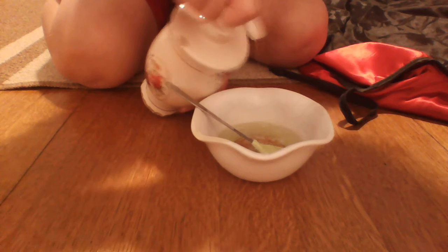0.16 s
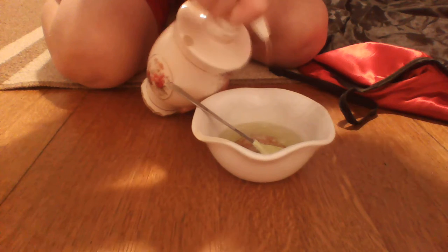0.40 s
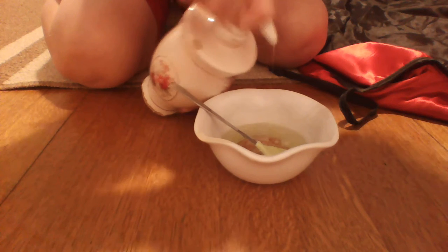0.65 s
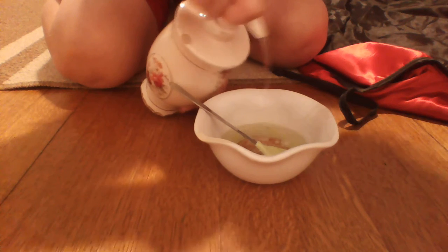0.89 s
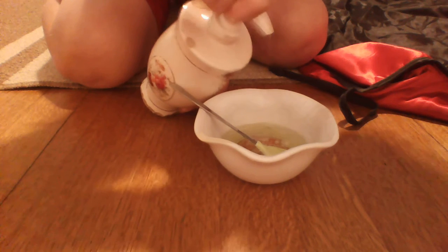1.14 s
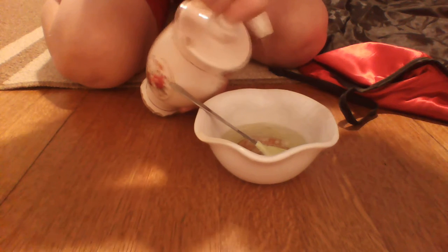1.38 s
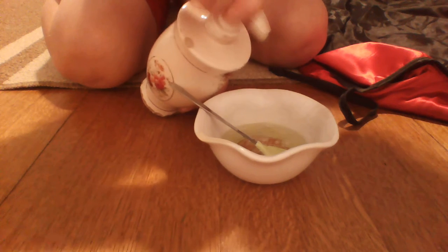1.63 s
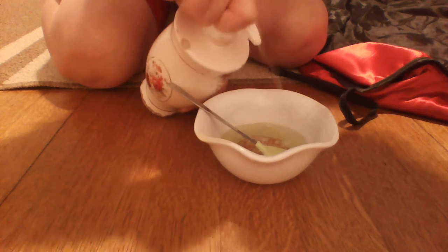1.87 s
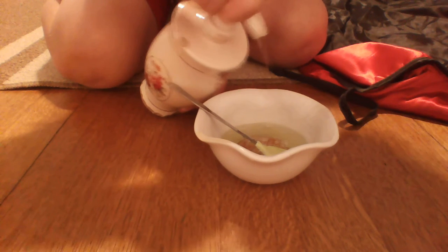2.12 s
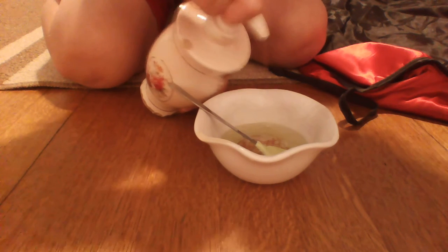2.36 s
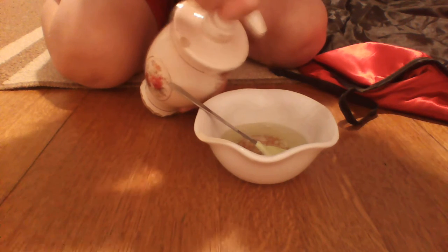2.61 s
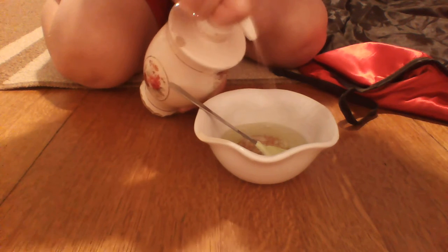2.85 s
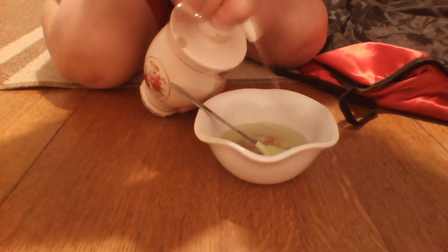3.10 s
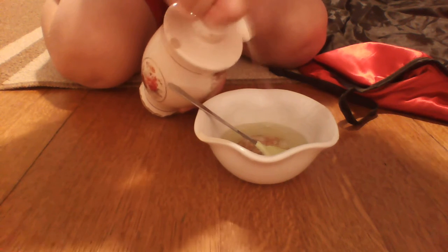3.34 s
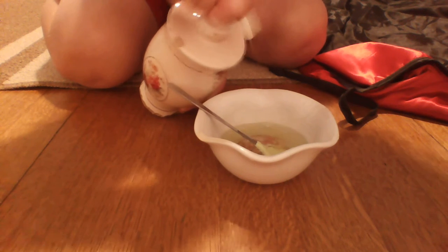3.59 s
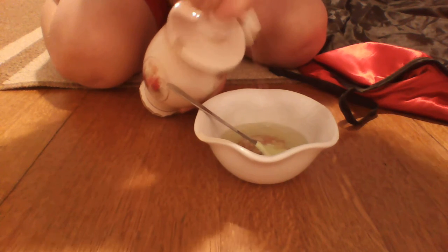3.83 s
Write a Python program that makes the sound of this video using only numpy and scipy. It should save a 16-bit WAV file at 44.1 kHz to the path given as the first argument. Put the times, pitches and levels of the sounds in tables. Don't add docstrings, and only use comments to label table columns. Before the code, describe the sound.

Three knocks of a ceramic jar on floorboards, then fast pump strokes thudding and clicking, with tiny ticks and clinks over camera hiss.

```python
import sys
import numpy as np
from scipy import signal
from scipy.fft import rfft, irfft, next_fast_len
from scipy.io import wavfile
from scipy.ndimage import uniform_filter1d

SR = 44100
rng = np.random.default_rng(int(sys.argv[2]) if len(sys.argv) > 2 else 0)


def wav_out(sig):
    wavfile.write(sys.argv[1], SR, np.round(np.clip(np.atleast_2d(sig).T, -1, 1) * 32767).astype(np.int16))


def volts(x):
    e = np.asarray(x, float) / 20
    return 10 ** e


N = 177855


def unit_rms(x):
    return x / np.sqrt(np.mean(x ** 2) + 1e-20)


def along(points, hz):
    point_hz, value = np.transpose(points)
    return np.interp(np.log(hz + 1), np.log(point_hz + 1), value)


def filtered(x, response):
    size = next_fast_len(x.shape[-1] + 8192)
    spectrum = rfft(x, size) * response(np.fft.rfftfreq(size, 1 / SR))
    return irfft(spectrum, size)[..., :x.shape[-1]]


def add(track, start_s, sound):
    part = track[..., round(start_s * SR):][..., :sound.shape[-1]]
    part += sound[..., :part.shape[-1]]


def ring(modes, scatter_db):
    t = np.arange(SR // 4) / SR
    hz, level_db, t60_s, sign = np.transpose(modes)[..., None]
    strength = np.sign(sign) * volts(level_db + scatter_db * rng.standard_normal(level_db.shape))
    modes_ringing = strength * volts(-60 * t / t60_s) * np.sin(2 * np.pi * hz * t)
    return np.sum(modes_ringing, axis=0)


def burst(hz, width_hz, t60_s, alike=0.87, rise_s=0.00039):
    t = np.arange(SR // 8 if t60_s > .045 else SR // 20) / SR
    envelope = volts(-60 * t / t60_s) * (1 - np.exp(-t / rise_s))
    common, apart = rng.standard_normal((2, len(t))) * envelope
    pair = [common + (1 - alike) * apart, common - (1 - alike) * apart]
    peak = signal.iirpeak(min(hz, SR / 2.2), hz / width_hz, SR)
    pair = signal.lfilter(*peak, signal.lfilter(*peak, pair))
    return pair / np.abs(pair).max()


def noise(spectrum, alike):
    def mid_side(hz):
        angle = np.arccos(np.clip(along(alike, hz), -1, 1)) / 2
        return volts(along(spectrum, hz)) * [np.cos(angle), np.sin(angle)]

    mid, side = filtered(rng.standard_normal((2, N)), mid_side)
    return unit_rms(np.array([mid + side, mid - side]))


# hz, density_db
HISS_COLOUR = [(30, -11.5), (90, -13), (240, -13), (800, -28), (4200, -32), (7300, -32), (12600, -24.5),
               (16500, -30.5)]
# hz, correlation
HISS_ALIKE = [(60, 0.15), (300, 0.59), (700, 0.35), (3000, -0.014), (7000, -0.3), (15000, -0.4)]
# hz, level_db, left_right_db, cycle_share, right_lag_rad
WHINES = [(8110, -71, -16, 0.58, 2.63), (12600, -59, 6, 0.26, 1.2), (12850, -66.5, 2, .27, 1.1),
          (11800, -62.5, -4.5, 0.47, 4)]
CYCLE_HZ = 7.4925


def camera():
    t = np.arange(N) / SR
    phase = (t * CYCLE_HZ + .1) % 1

    def gate(start, share):
        return uniform_filter1d(1. * ((phase - start) % 1 < share), size=200)

    hiss = volts(-51.5) * noise(HISS_COLOUR, HISS_ALIKE)
    treble = filtered(hiss, lambda hz: hz ** 4 / (hz ** 4 + 8000 ** 4))
    out = hiss - 0.32 * gate(0.44, 0.12) * treble
    for hz, level_db, pan_db, share, lag_rad in WHINES:
        drift = np.cumsum(rng.standard_normal(N)) * 0.055
        tone = np.sin(2 * np.pi * hz * t + drift - lag_rad * np.array([[0], [1]]))
        level = volts(level_db + pan_db * np.array([[.5], [-.5]]))
        out += level * gate(.26 - share, share) * tone
    return out


# peak_s, level_db, rise_s, fall_s
SHIFTS = [
    (.11, -36.5, 0.055, .2),
    (.41, -49.5, 0.036, 0.81),
    (0.981, -36.5, .09, 0.42),
    (1.77, -52, 0.31, .7),
    (2.6, -55, 0.76, .1),
    (2.9, -51, .1, 0.986),
    (3.43, -48, 0.16, 0.1),
    (3.88, -54, 0.118, .2),
]
# hz, density_db
RUMBLE_COLOUR = [(12, -27.5), (22, -1.5), (40, -3), (65, -0.5), (90, -5.5), (118, -27), (170, -39.5),
                 (290, -120)]
MURMUR_DB = -60.5


def rumble():
    peak_s, level_db, rise_s, fall_s = np.transpose(SHIFTS)[..., None]
    late_s = np.arange(N) / SR - peak_s
    swells = volts(level_db - 20 * np.where(late_s < 0, -late_s / rise_s, late_s / fall_s))
    level = np.sqrt(np.sum(swells ** 2, axis=0) + volts(MURMUR_DB) ** 2)
    return level * noise(RUMBLE_COLOUR, [(60, .88)]) * volts([[.4], [-.4]])


# start_s, peak_db, brightest_hz
TICKS = [(.2775, -40, 5770), (.5054, -43, 12450), (.7752, -41, 5945), (1.2516, -38.5, 6200),
         (1.6756, -34.5, 12500), (1.7928, -36.5, 9400), (1.8672, -40.5, 12450), (2.0511, -32.5, 9100),
         (2.2324, -40, 12500), (2.367, -30.5, 12700), (2.6464, -32.5, 12200), (2.9321, -31.5, 12600),
         (3.1861, -34, 12800), (3.3899, -29, 13200), (3.6341, -35.5, 12380), (3.8593, -28.5, 13160)]
# start_s, peak_db, brightest_hz
THIN_TICKS = [
    (.044, -37, 11800),
    (.535, -41, 5800),
    (3.688, -38, 14500),
    (3.691, -26, 14130),
]
# start_s, peak_db, brightest_hz
DULL_TICKS = [
    (.4159, -46, 6324),
    (.6353, -51.5, 13000),
]
TICK_LAW, THIN_LAW, DULL_LAW = (-11.5, 0.69), (-27, .1), (8.2, 0.59)


def valve():
    out = np.zeros((2, N))
    kinds = [(TICKS, TICK_LAW), (THIN_TICKS, THIN_LAW), (DULL_TICKS, DULL_LAW)]
    ticks = sorted((*row, *law) for rows, law in kinds for row in rows)
    for start_s, peak_db, hz, dull_db, breadth in ticks:
        snap = burst(hz, 3130, 0.0079, alike=0.26)
        snap = snap + breadth * burst(9000, 7800, 0.013, alike=0.93)
        add(out, start_s, volts(peak_db - 1.0) * snap)
        add(out, start_s, volts(peak_db + dull_db + 3) * burst(2400, 1400, .016))
    return out


# start_s, force_db, click_hardness_db (over force)
PRESSES = [(.0591, -33.5, 0.5), (.541, -31.5, -8), (.7979, -42.5, -0.5), (1.0394, -30.5, -11),
           (1.2819, -41, -46), (1.476, -30, -17), (1.8767, -30.5, -15.5), (2.2398, -30, -10),
           (2.5187, -28, -9.5), (2.8071, -29.5, -12.5), (3.0812, -26.5, -4), (3.3174, -30.5, -10),
           (3.527, -28.5, -8.5), (3.7705, -30.5, -9), (3.9186, -43, -1), (4.0063, -30, -8)]
# start_s, force_db, click_hardness_db
RETURNS = [(.9, -38, 3), (1.3601, -37.5, 4.5), (1.6985, -34.5, -.5), (1.7562, -36, 6.5),
           (2.0747, -34.5, -7.5), (2.386, -32.5, -3), (2.44, -37.5, 7.5), (2.669, -36, -13),
           (2.9504, -33, -2), (3.0004, -34, 3.5), (3.208, -33.5, -3.5), (3.3993, -32, -5.5),
           (3.4277, -33.5, 5.5), (3.6628, -33, -4), (3.878, -35.5, -5)]
# start_s, force_db, click_hardness_db
SETTLES = [(1.1161, -43.5, -16), (1.5517, -40.5, -19), (1.9465, -45.5, -23), (2.154, -43.5, -0.5),
           (2.305, -44.5, -14.5), (2.5749, -40.5, 11), (2.842, -44, -3), (2.863, -45, -2),
           (3.108, -44, -34), (3.224, -56, -9), (3.5783, -44, -15), (3.6973, -55, 27.5),
           (3.9509, -40.5, -3)]
# direction, hollow_db (over force), hollow_db_per_hardness_db,
# tap_db (over force), tap_db_per_hardness_db
PRESS_LAW = (1, -3.5, -.2, -7.5, 0)
RETURN_LAW = (-0.5, 3.6, 0.91, -7, 0.16)
SETTLE_LAW = (-1, 9, .15, -14, .3)
GRIP_S, GRIP_DB_PER_S = 2.66, -3.5


def stops():
    rows = []
    for table, law in [(PRESSES, PRESS_LAW), (RETURNS, RETURN_LAW), (SETTLES, SETTLE_LAW)]:
        way, hollow_db, hollow_grows, tap_db, tap_grows = law
        for start_s, force_db, hard_db in table:
            grip_db = GRIP_DB_PER_S * max(start_s - GRIP_S, 0)
            hollow = force_db + hollow_db + hollow_grows * hard_db + grip_db
            tap = force_db + tap_db + tap_grows * hard_db
            rows.append((start_s, way, force_db, hollow, tap, force_db + hard_db))
    return sorted(rows)


# hz, level_db, t60_s, sign
BOOM = [(95, -13, .3, -1), (164, -10, .22, 1), (195, -7, .27, -1), (211, -6, .2, 1), (239, -2, .26, -1),
        (275, -13, .23, 1), (298, -18, .13, -1)]
# hz, level_db, t60_s, sign
HOLLOW = [(376.9, -19.5, 0.043, -1), (492.9, -4.5, 0.047, 1), (663, -10.5, 0.013, -1)]
PUSH_RISE_S = .003


def pump():
    out = np.zeros((2, N))
    push = 1 - np.exp(-np.arange(SR // 4) / SR / PUSH_RISE_S)
    for start_s, way, boom_db, hollow_db, tap_db, click_db in stops():
        boom = volts(boom_db) * push * ring(BOOM, scatter_db=2.3) * volts([[.4], [-.4]])
        hollow = volts(hollow_db) * ring(HOLLOW, scatter_db=3.0)
        add(out, start_s, np.sign(way) * (boom + hollow))
        tap = 0.57 * burst(1400, 600, 0.016) + 0.4 * burst(860, 500, 0.016)
        add(out, start_s, volts(tap_db + 0.7) * tap)
        drag = burst(2400, 1900, 0.13, rise_s=0.0067, alike=0.57)
        add(out, start_s - .008, volts(click_db / 2 - 34.0) * drag)
        click = burst(2240, 1000, 0.0099) + 0.82 * burst(2880, 946, 0.0097)
        click = click + 0.14 * burst(8000, 12000, 0.0066)
        add(out, start_s, volts(click_db - 3.5) * click)
    return out


# start_s, peak_db, boom_db
KNOCKS = [
    (0.0821, -5, -24),
    (0.379, -9.5, -35.5),
    (0.552, -20, -41),
]
# hz, level_db, t60_s, sign
PLANK = [(422.8, -15.5, 0.034, 1), (565, -15.5, 0.019, 1), (608, -19.5, 0.11, -1), (655, -14.5, 0.025, 1),
         (872.4, -13, 0.022, -1), (912, -14.5, 0.041, -1), (1109, 1.5, 0.0067, 1), (1210, 1, 0.0086, -1),
         (1623, -6.5, 0.019, 1), (1364, -22.5, 0.031, -1), (1740, -20, 0.017, -1)]
# hz, level_db, t60_s, sign
JOISTS = [(183, -7, 0.095, -1), (225, 4, 0.036, 1), (238.5, -1, 0.24, -1), (264.3, -11.5, 0.27, 1),
          (285, -16.5, 0.23, -1), (387, -22.5, 0.34, 1)]
SOFTER_DB_PER_OCTAVE, SOFTEST_DB, PIVOT_HZ = 0.2159, 18.5, 900


def knocks():
    out = np.zeros((2, N))
    touches = [(.059, -37.5, -58.5), (.5597, -60, -38), (1.7155, -46, -51)]
    for start_s, peak_db, boom_db in KNOCKS + touches:
        soft = SOFTER_DB_PER_OCTAVE * min(KNOCKS[0][1] - peak_db, SOFTEST_DB)
        plank = [(hz, level_db - soft * np.log2(hz / PIVOT_HZ), t60_s, sign)
                 for hz, level_db, t60_s, sign in PLANK]
        add(out, start_s, volts(peak_db + 4.0) * ring(plank, scatter_db=.8))
        add(out, start_s, volts(boom_db + 6.5) * ring(JOISTS, scatter_db=3.3))
        dense = burst(1500, 1100, 0.017, rise_s=0.0014, alike=0.43)
        add(out, start_s, volts(peak_db - 12.5) * dense)
        low_tail = burst(620, 740, 0.16, rise_s=0.00093, alike=0.23)
        add(out, start_s, volts(peak_db - 17.0) * low_tail)
    return out


# start_s, crack_db, belly_db, shoulder_db
RATTLE = [
    (.0827, -23, -16.5, -28),
    (.091, -27, -31, -26),
    (.0972, -20.5, -48, -28.5),
    (.1054, -42, -40, -50.5),
    (.3795, -31, -33, -23),
    (.3854, -27, -23, -41.5),
    (.3934, -34.5, -55, -33),
    (.5531, -37, -43, -38),
]
# start_s, crack_db, belly_db, shoulder_db
CLINKS = [(.0795, -51, -41, -39.5), (.2658, -44, -55, -56), (.2959, -34, -48, -44),
          (.3364, -43, -54.5, -47.5), (.6561, -44, -44.5, -47), (1.7144, -37.5, -50, -44.5),
          (2.5743, -22, -39, -35), (2.63, -58, -45, -64), (2.7747, -32.5, -46, -44),
          (2.8661, -36, -44.5, -46), (3.0536, -26.5, -36.5, -35.5), (3.2204, -54, -44, -54),
          (3.6969, -22, -33.5, -34), (3.93, -30.5, -36, -42)]
# hz, level_db, t60_s, left_right_db (lying tilted)
JAR = [(1978, 1.5, 0.048, 2), (2008, -14, 0.2, 16), (1866, -7, .05, -8), (2240, -18, 0.018, -4),
       (2620, -26, 0.019, -4), (3240, 0.5, 0.04, 1), (3814.6, -1, 0.066, -3), (4659.7, 0, 0.063, -6.5),
       (4820, -19, 0.11, -2), (4870, -2.5, 0.028, -8.5), (5770, 6.5, 0.055, -8), (6260, 0, 0.065, -10.5)]


def ceramic(contacts, tilt, chime_db, crack_gain_db, free, scrape_db, chatter_db, neck_db, lip_db):
    out = np.zeros((2, N))
    t = np.arange(SR // 5) / SR
    hz, mode_db, t60_s, pan_db = np.transpose(JAR)[..., None]
    group = np.searchsorted([3000, 4300, 5400], hz)
    for start_s, crack_db, belly_db, shoulder_db in contacts:
        group_db = [belly_db, crack_db + neck_db, shoulder_db, crack_db + lip_db]
        loudest_db = max(group_db)
        wander = np.cumsum(rng.standard_normal((len(hz), len(t))), axis=1) * 0.049
        spread, detune = rng.standard_normal((2, *hz.shape))
        level_db = np.array(group_db)[group] + mode_db + 6 + 1.7 * spread
        envelope = volts(level_db - 60 * t / (free * t60_s)) * (1 - np.exp(-t / 0.0025))
        tones = envelope * np.sin(2 * np.pi * hz * (1 + 0.0013 * detune) * t + wander)
        sides = [np.sum(tones * volts(side * tilt * pan_db / 2), axis=0) for side in (1, -1)]
        add(out, start_s, np.array(sides))

        crack = burst(12000, 8000, 0.015, alike=0.11) * volts([[-.8], [.8]])
        add(out, start_s, volts(crack_db + crack_gain_db) * crack)
        add(out, start_s, volts(crack_db + chime_db) * burst(8050, 350, .035, alike=.3))
        add(out, start_s, volts(loudest_db - 5.5) * burst(1600, 6000, 0.012, alike=0.11))
        scrape = burst(470, 500, 0.13, rise_s=0.00067, alike=0.93)
        add(out, start_s, volts(loudest_db + scrape_db) * scrape)
        belly = burst(1994, 250, 0.21, rise_s=0.0013, alike=0.23)
        add(out, start_s, volts(group_db[0] + chatter_db) * belly)
        lip = burst(5560, 1500, 0.17, rise_s=0.0038, alike=0.35)
        add(out, start_s, volts(group_db[3] + chatter_db) * lip)
        neck = burst(3400, 2000, 0.092, rise_s=0.0036, alike=0.21)
        add(out, start_s, volts(group_db[1] + chatter_db) * neck)
    return out


# hz, t60_s
ROOM = [(150, 0.63), (700, 0.46), (2000, 0.33), (8000, 0.28)]


def room(x):
    out = np.zeros((2, N))
    step = SR // 3
    for start in range(0, N, step):
        hz, t, cells = signal.stft(rng.standard_normal((2, SR // 2)), SR, nperseg=256)
        decay = volts(-60 * t / along(ROOM, hz)[:, None])
        tail = signal.istft(cells * decay, SR, nperseg=256)[1]
        tail = 0.86 * tail[0] + 0.45 * tail[1] * [[1], [-1]]
        tail = tail / np.linalg.norm(tail[0])
        wet = signal.fftconvolve(x[None, start:start + step], tail, axes=1)
        add(out, start / SR + .004, wet)
    return out


# start_s, length_s, pitch_hz, level_db
CREAKS = [
    (0.796, 0.12, 720, -63.5),
    (1.125, 0.24, 600, -63),
]


def creaks():
    out = np.zeros(N)
    for start_s, length_s, hz, level_db in CREAKS:
        t = np.arange(round(length_s * SR)) / SR
        wander = 0.039 * np.cumsum(rng.standard_normal(len(t)))
        swell = np.sin(np.pi * t / length_s) ** 0.59
        add(out, start_s, volts(level_db) * swell * np.sin(2 * np.pi * hz * t + wander))
    return out


def scene():
    background = camera() + rumble()
    ticks = valve()
    strokes = pump()
    blows = knocks()
    rattle = ceramic(RATTLE, tilt=1.23, chime_db=-7.0, crack_gain_db=4.0, free=0.49,
                     scrape_db=-0.5, chatter_db=-21.5, neck_db=-10, lip_db=-24)
    clinks = ceramic(CLINKS, tilt=0.29, chime_db=-11, crack_gain_db=1.0, free=0.43,
                     scrape_db=-2.5, chatter_db=-3.5, neck_db=-12.5, lip_db=-14.5)
    bright = rattle + clinks + ticks
    above_boom = filtered(strokes, lambda hz: hz ** 4 / (hz ** 4 + 330 ** 4))
    to_room = volts(-13.5) * blows + volts(-9.5) * above_boom + volts(-11.5) * bright
    return blows + strokes + bright + room(to_room.mean(0)) + background + creaks()


def band_limit(x):
    return signal.sosfilt(signal.butter(12, 16820, fs=SR, output="sos"), x)


def record(dry):
    top_hz = 15850
    edge_hz = [top_hz, top_hz + 100, top_hz + 900, top_hz + 950]
    limited = filtered(dry, lambda hz: volts(np.interp(hz, edge_hz, [0, -24, -30, -90])))
    return band_limit(limited)


dry = scene()
out = record(dry)
wav_out(out)
```